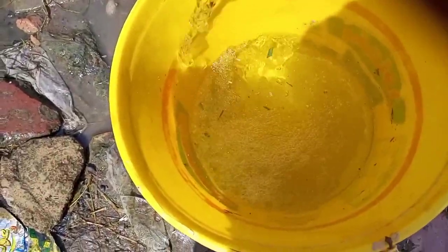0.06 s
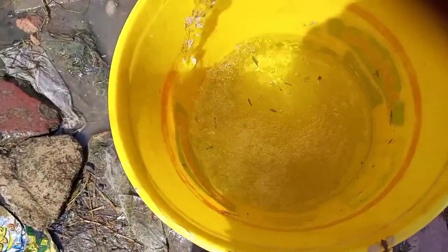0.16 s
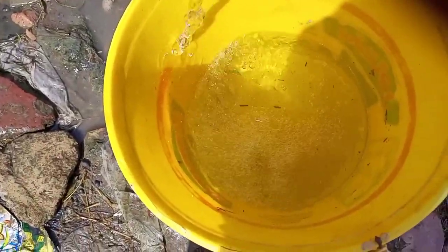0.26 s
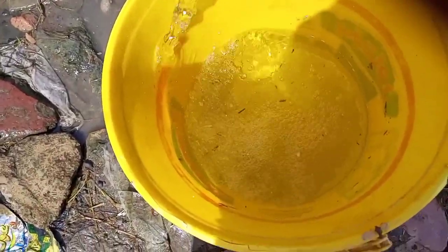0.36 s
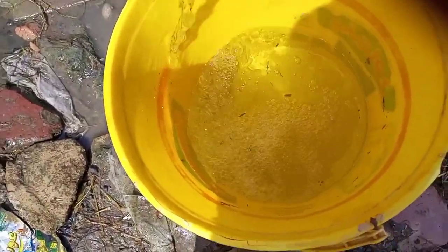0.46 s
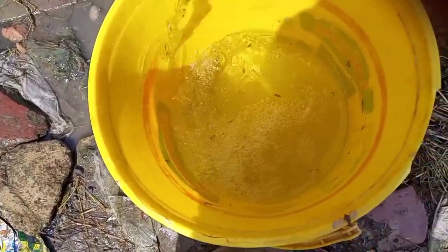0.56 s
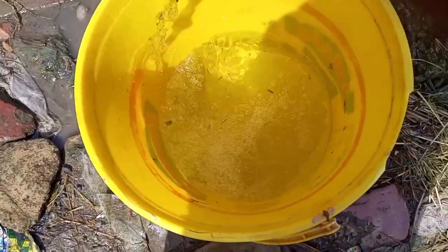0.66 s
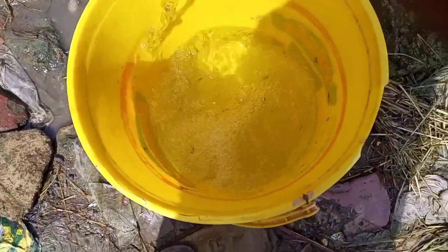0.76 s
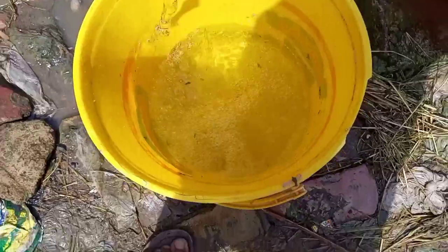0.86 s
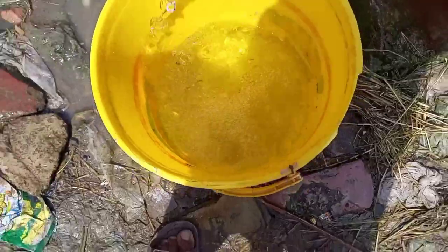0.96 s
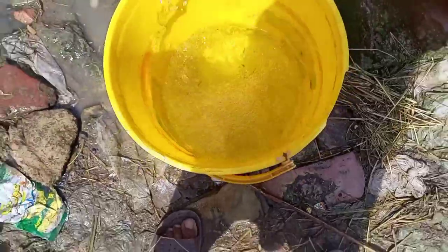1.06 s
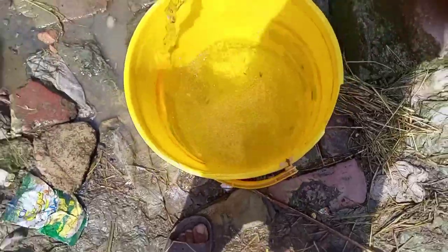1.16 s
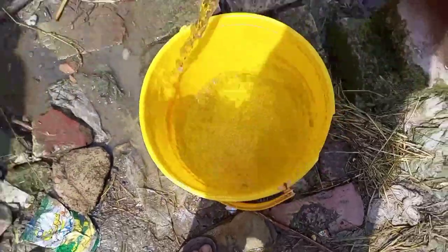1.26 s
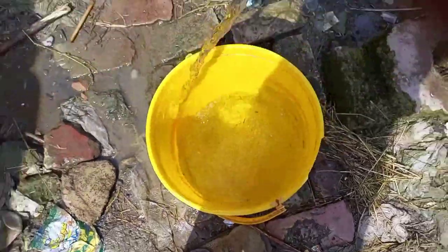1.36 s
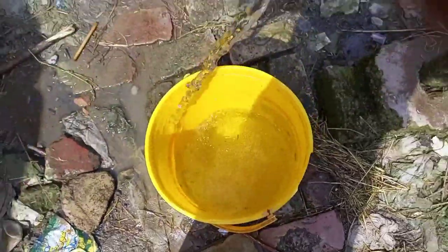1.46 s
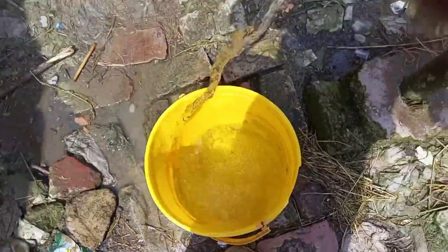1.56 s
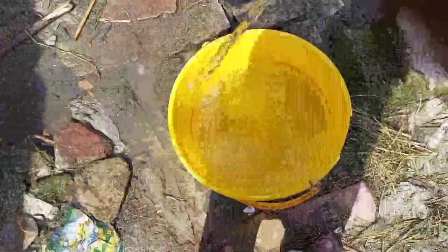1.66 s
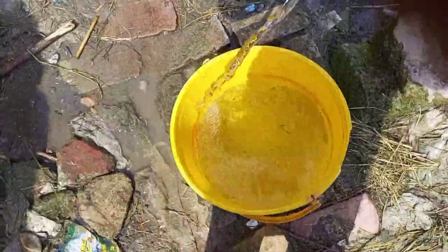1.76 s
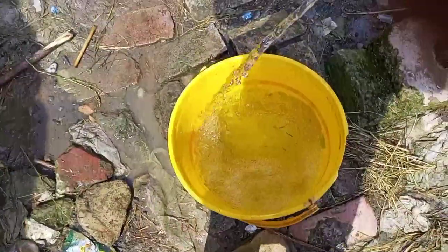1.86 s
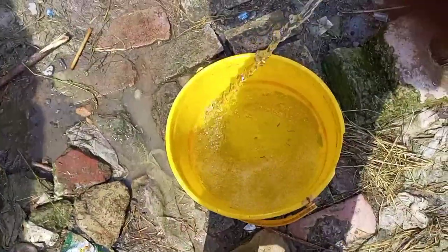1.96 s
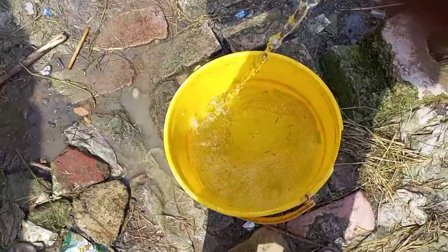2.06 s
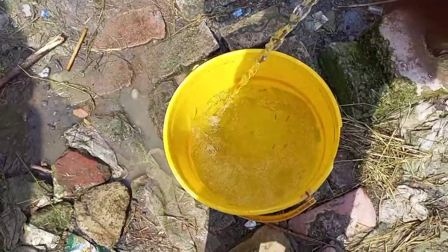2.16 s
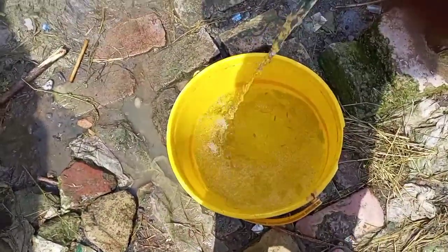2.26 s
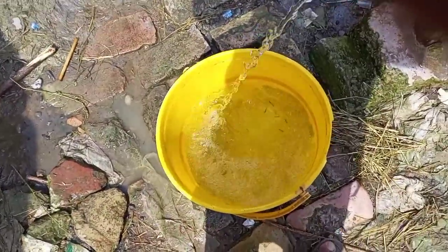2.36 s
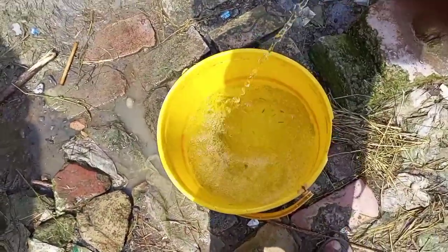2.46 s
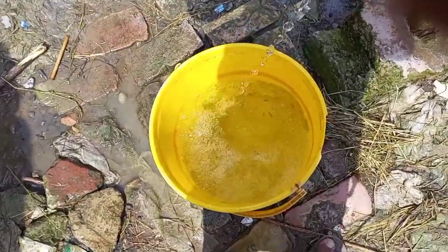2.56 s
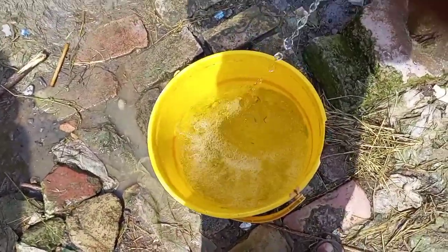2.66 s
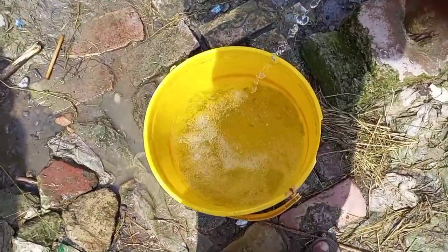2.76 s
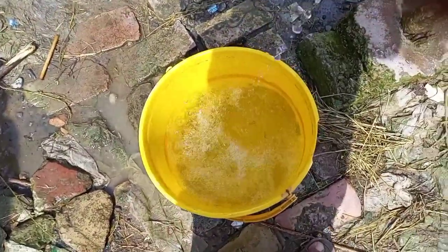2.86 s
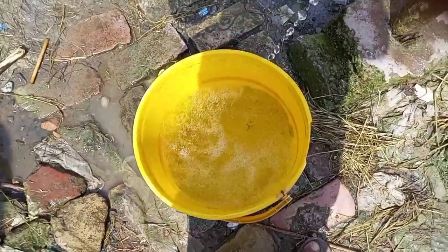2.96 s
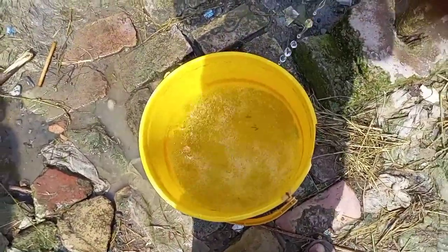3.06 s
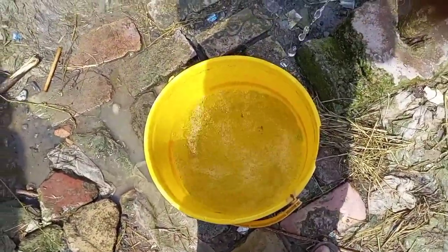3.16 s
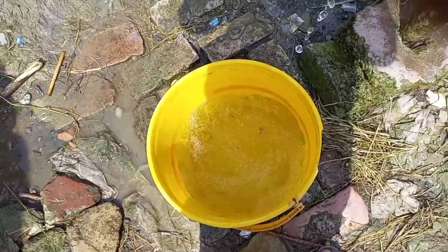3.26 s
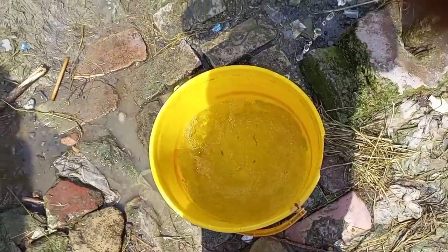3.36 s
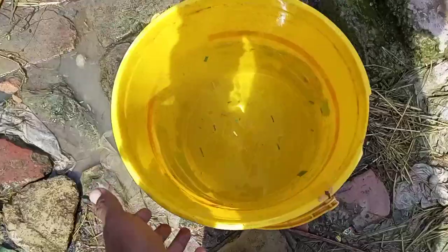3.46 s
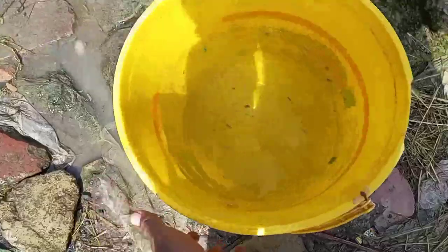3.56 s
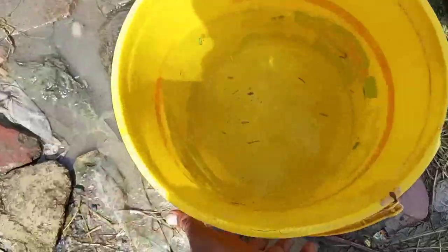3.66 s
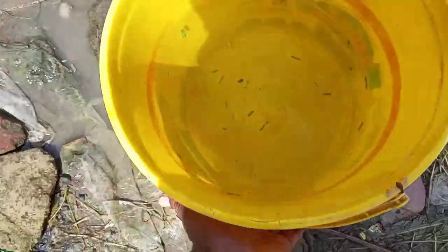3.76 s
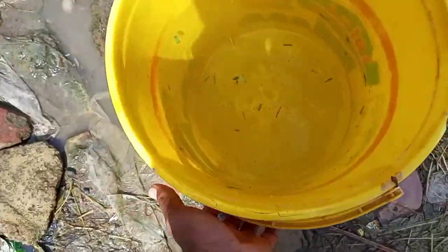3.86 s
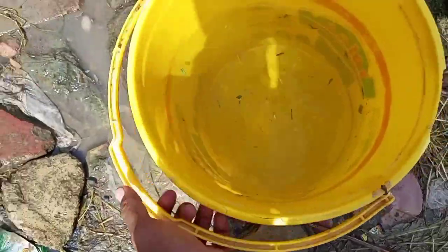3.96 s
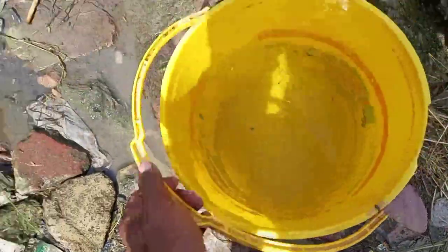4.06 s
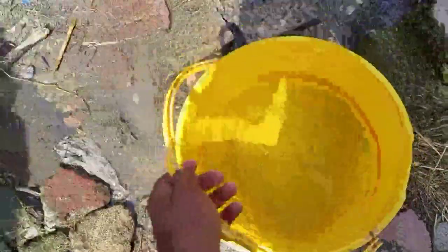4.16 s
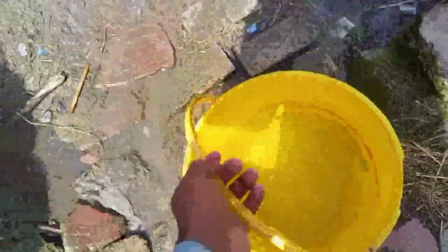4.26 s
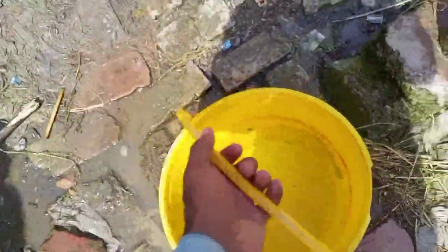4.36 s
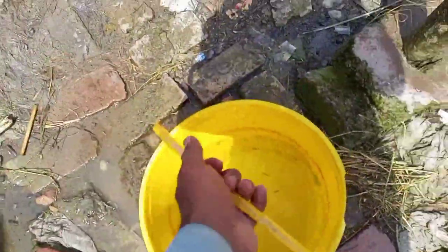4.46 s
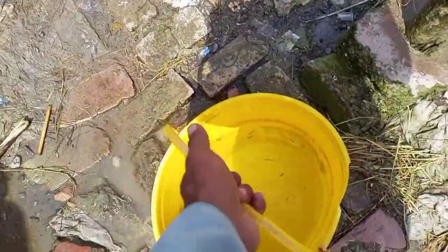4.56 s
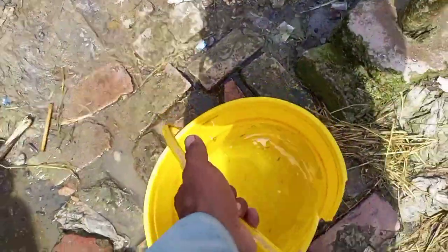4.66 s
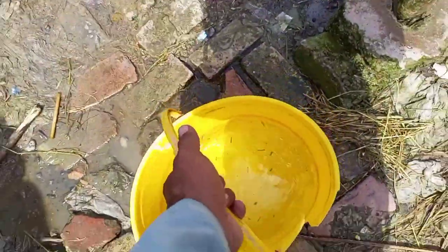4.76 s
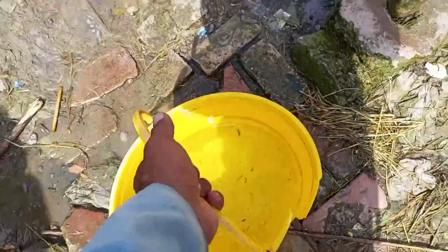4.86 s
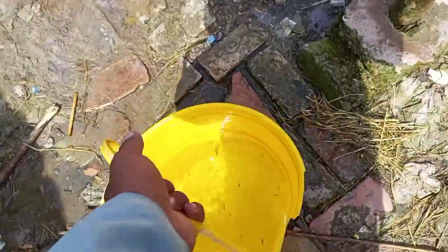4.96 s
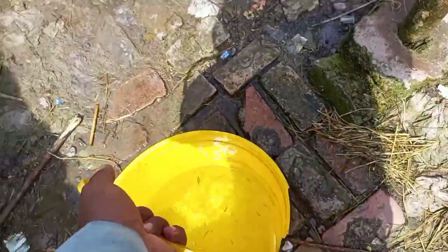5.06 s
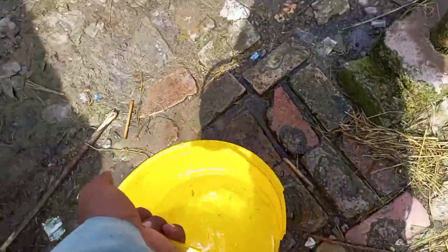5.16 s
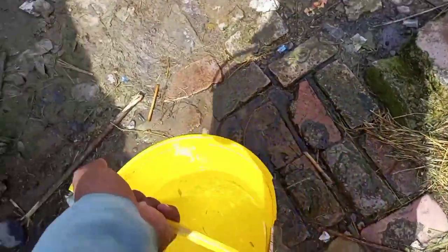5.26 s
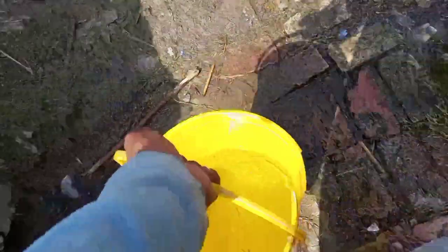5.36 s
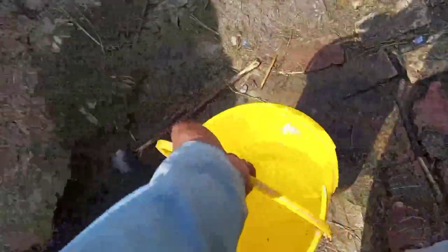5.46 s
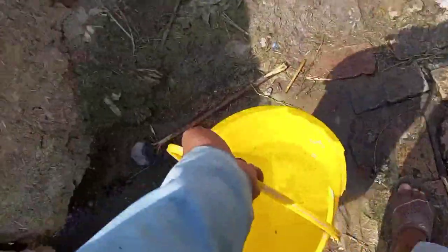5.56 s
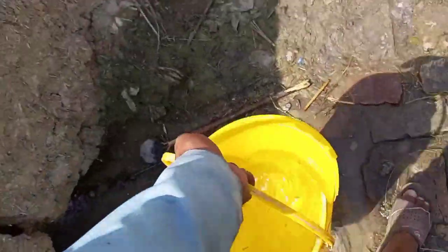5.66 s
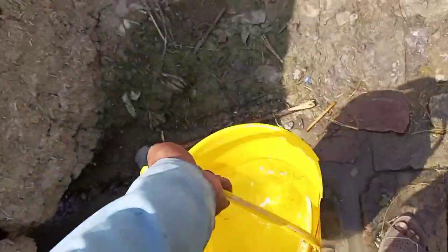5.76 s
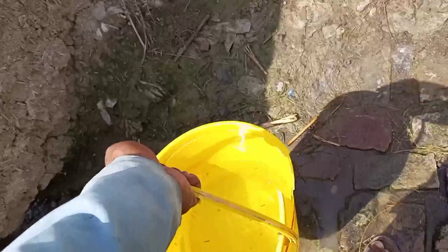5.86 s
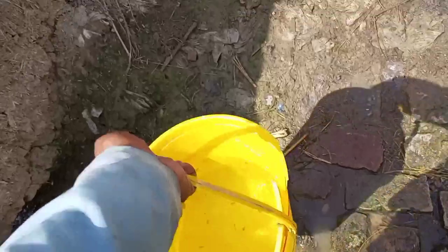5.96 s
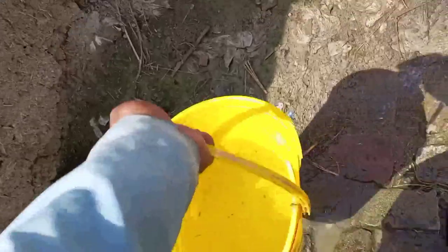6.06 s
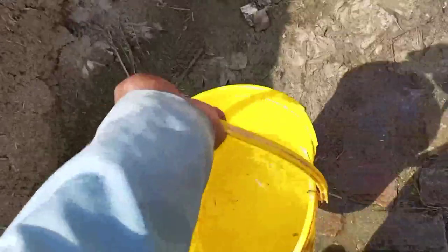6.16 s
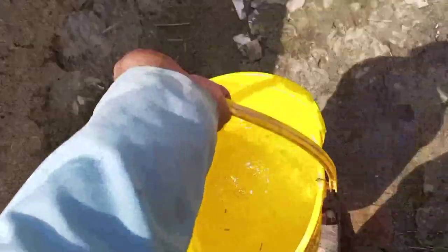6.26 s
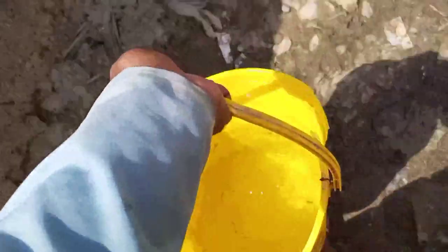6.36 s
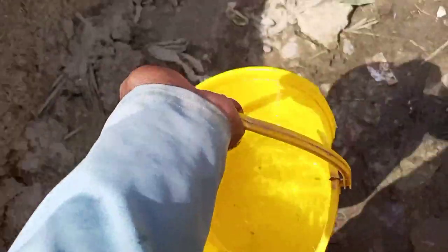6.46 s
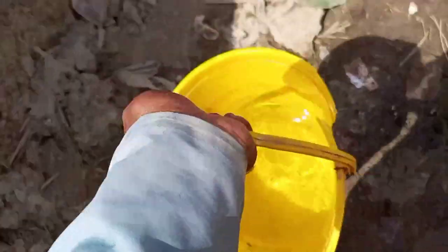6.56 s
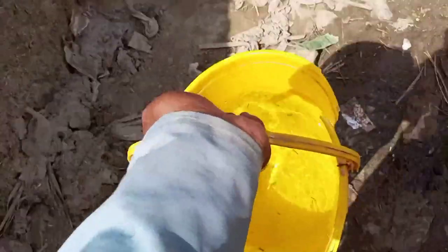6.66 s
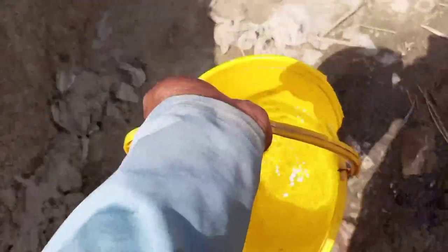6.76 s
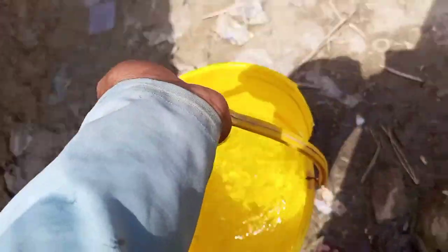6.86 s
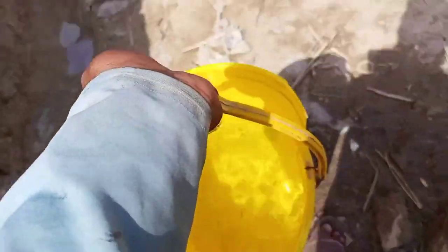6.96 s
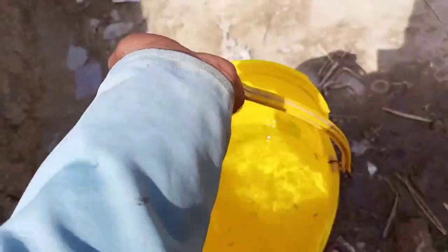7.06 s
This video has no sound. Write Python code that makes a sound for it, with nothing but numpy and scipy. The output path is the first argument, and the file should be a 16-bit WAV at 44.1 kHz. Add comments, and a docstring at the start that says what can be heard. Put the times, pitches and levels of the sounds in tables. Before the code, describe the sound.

From 0 s, a strong jet from a hand pump fizzes and gurgles into a plastic bucket, close and bright, with a short reflection off yard walls. Loose iron clanks at about 0.3, 0.6, 1.0-1.1 and 1.6 s, with a high ping near 1.2. From 1.9 s the flow weakens into lumpy splats, thickest at 2.1-2.9, then thin patter and low plops until about 3.4, with a tiny dropout at 3.5. Harsh rising bird chirps come at 3.7-3.8. The handle scrapes and rattles from 3.8, knocks at 3.9-4.3 and 4.5-4.7, then snaps in a loud double clack at 4.73-4.76; water sways softly. Faint whistles sound around 4.1-4.4 and 5.8-6.1, tweets at 6.3, a chirp at 6.6. From 4.9 to 6.9 a distant engine hoots four times a second. Dull taps at 4.4 and 5.5-5.8, gritty scuffs at 5.8, 6.5 and 7.1, and small ringing drips from 6.8 accompany carrying.

```python
"""A hand pump gushes into a plastic bucket in a village yard: its iron parts clank as noise bursts that ring
modes, while the jet fizzes and gurgles as clouds of bubble tones, then breaks into splats and dies. Harsh
gliding chirps follow; the handle is raised, drags as rattling noise and knocks as clicks and ringing plastic.
Birds whistle gliding tones, and far away a mill engine hoots four times a second with short sagging notes.
Meanwhile the bucket is carried off with noise taps and scuffs, and a few last drips ring."""
import sys
import numpy as np
from scipy import signal
from scipy.fft import rfft, irfft, next_fast_len
from scipy.io import wavfile
from scipy.ndimage import uniform_filter1d, map_coordinates

SR = 44100
rng = np.random.default_rng(int(sys.argv[2]) if len(sys.argv) > 2 else 0)


def wrap_up_sound(samples):
    """Save the sound to the file named by the first command line argument, as 16-bit audio."""
    columns = np.atleast_2d(samples).T
    # keep every value between -1 and 1, then stretch to whole-number steps
    tamed = np.clip(columns, -1, 1)
    steps = np.round(tamed * 32767).astype(np.int16)
    wavfile.write(sys.argv[1], SR, steps)


N = 313536  # length of the scene in samples

# Colour of the faint air noise. Each row: frequency in Hz, level in dB per Hz.
AIR_COLOUR = [(47, -34), (80, -5), (586, -11.5), (3140, -19.5), (4380, -13), (5350, -25), (6670, -13.5),
              (9930, -19.5), (15800, -36.5)]
# Brief swells of faint background noise. Each row: start in seconds, length in seconds, level in dB.
SWELL_TIMES = [(4.786, 0.11, -64.5), (5.046, 0.15, -69)]
# Colour of the swells, strongest near 4.4 kHz. Each row: frequency in Hz, level in dB per Hz.
SWELL_COLOUR = [(1300, -20), (2400, -4.5), (3300, -21.5), (4400, 3), (5400, -19.5), (10000, -14),
                (11500, -31)]
SWELL_RELEASE_S = 0.3  # seconds to fall 60 dB
# Hoots of the mill exhaust. Each row: start in seconds, level in dB before the echo levels.
MILL_HOOTS = [(4.919, -56.5), (5.158, -57), (5.404, -51), (5.65, -49), (5.89, -49.5), (6.129, -50.5),
              (6.374, -51), (6.621, -45), (6.891, -52.5)]

# Level, slightly arched bird notes. Each row: start in seconds, length in seconds, middle pitch in Hz, level in dB.
BIRD_WHISTLES = [(4.054, 0.089, 2530, -57.5), (4.2, 0.079, 2437, -58.5), (4.374, 0.17, 2614, -64.5),
                 (5.825, 0.076, 2440, -72.5), (6.048, 0.092, 2470, -68)]
# Quick falling tweets of another bird. Each row: start in seconds, level in dB.
BIRD_TWEETS = [(6.286, -68), (6.334, -62), (6.388, -66.5)]
# Harsh chirps. Each row: start in seconds, length in seconds, start, middle and end pitch in Hz, level in dB.
BIRD_CHIRPS = [(3.723, 0.053, 3800, 5260, 6330, -47.5), (3.734, 0.068, 2090, 3020, 3500, -58.5),
               (3.753, 0.043, 3870, 3650, 4140, -42), (3.8, 0.0326, 4120, 3804, 3970, -46),
               (6.56, 0.089, 2360, 3970, 3450, -57)]
WHISTLE_ARCH = .025  # share by which the ends of a whistle lie below its middle
CHIRP_RASP = .028  # share by which the pitch of a chirp jitters
BENDS_PER_S = 65  # pitch bends in a bird's note

# Dull taps while lifting and walking. Each row: start in seconds, peak level in dB.
DULL_TAPS = [(4.362, -22), (5.502, -22), (5.576, -36.5), (5.839, -33.5)]
# Colour of a dull tap. Each row: frequency in Hz, level in dB per Hz.
TAP_COLOUR = [(60, -36.5), (700, 7.5), (1200, -1.5), (2400, -20.5), (4000, -36.5)]
# Hand, sleeve and soles scuffing. Each row: start in seconds, length in seconds, level in dB.
SCUFF_TIMES = [(3.9, 0.13, -51), (4.593, 0.19, -54.5), (5.845, 0.0104, -46.5), (6.475, 0.02, -46),
               (6.491, 0.065, -50.5), (6.529, 0.16, -65.5), (7.072, 0.11, -45.5)]
# Colour of the gritty scuffs. Each row: frequency in Hz, level in dB per Hz.
SCUFF_COLOUR = [(100, -29.5), (800, 1.5), (1300, -10), (2900, -2.5), (4400, 8), (10000, 1), (12500, -14)]
SCUFF_ATTACK_SHARE, SCUFF_RELEASE_S = 0.37, 0.041
# The water sways after a jolt. Each row: start in seconds, length in seconds, level in dB.
SWAYS = [(3.962, 0.089, -46), (4.524, 0.18, -52), (4.753, 0.075, -58.5)]
SWAY_ATTACK_SHARE, SWAY_RELEASE_S = 0.64, 0.69

# The handle drags over the rim. Each row: start in seconds, length in seconds, level in dB.
RIM_RUBS = [(3.813, .205, -38), (4.036, 0.069, -51.5), (4.132, 0.0054, -35)]
# Colour of the dragging. Each row: frequency in Hz, level in dB per Hz.
RUB_COLOUR = [(400, -26), (1550, 4.5), (2600, 0.5), (7000, -21.5)]
RUB_ATTACK_SHARE = 0.97
# The handle knocks on the bucket. Each row: start in seconds, then levels in dB of
# the belly, the wall and the click, before the gain of each part.
HANDLE_KNOCKS = [(3.948, -48, -29, -34), (4.013, -50, -16.5, -32), (4.087, -52, -45, -48),
                 (4.112, -47, -43, -55.5), (4.142, -27, -21.5, -37), (4.245, -49, -29, -60.5),
                 (4.269, -39, -38.5, -57.5), (4.503, -46, -33, -62), (4.582, -38, -22.5, -36),
                 (4.664, -46.5, -29.5, -26), (4.729, -17.5, -12, -8), (4.755, -9, -9.5, -8.5)]
# Tones of the water-loaded belly. Each row: pitch in Hz, relative level in dB, time to fall 60 dB in seconds.
BELLY_MODES = [(171, -10.5, 0.17), (243.8, -3.5, 0.17), (330, 7.5, 0.091), (367.4, 11.5, 0.098)]
# Tones of the plastic wall. Each row: pitch in Hz, relative level in dB, time to fall 60 dB in seconds.
WALL_MODES = [(624, -4.5, 0.044), (791, -4, 0.095), (836, 7, 0.046), (1440, 1, 0.018)]
# Colour of the dry click. Each row: frequency in Hz, level in dB per Hz.
CLICK_COLOUR = [(80, -39), (500, -12), (2600, -0.5), (4200, 9), (6500, 2), (10500, -8), (13000, -23),
                (15200, -14)]
# Colour of the handle's rattle against the wall. Each row: frequency in Hz, level in dB per Hz.
RATTLE_COLOUR = [(100, -33.5), (260, -7.5), (500, -6), (900, 2.5), (1450, 11.5), (2100, -8), (3200, -4.5),
                 (6000, -31.5)]
RATTLE_DB, RATTLE_T60 = 16, 0.026  # gain on top of the wall level; seconds to fall 60 dB

# Tones of the pump lever. Each row: pitch in Hz, relative level in dB.
LEVER_MODES = [(647, -13), (1960, -11), (3260, 2), (3810, -1), (5460, -4), (6310, -1), (7090, -9),
               (9130, -4), (9380, -8), (10090, -8), (11680, -13)]
# Tones of the pivot pin. Each row: pitch in Hz, relative level in dB.
PIN_MODES = [(650, -14), (1700, -11), (3600, -4), (4890, 1), (5830, -2), (6080, -3), (6720, -11),
             (8920, -6), (11900, -6), (12200, -3)]
# Tones of the piston rod. Each row: pitch in Hz, relative level in dB.
ROD_MODES = [(2690, -12), (3400, 1), (3780, -2), (4610, -2), (4910, -5), (5060, -5), (5450, 0), (6680, -7),
             (8480, -14), (9120, -10), (9440, -10), (9780, -12), (11170, -6)]
# Blows on the lever. Each row: start in seconds, level in dB before the shared gains,
# decay time of the chatter in seconds, pitch in Hz that the contact point favours.
LEVER_HITS = [(0.276, -24, 0.0062, 4600), (0.291, -18, 0.0024, 3600), (1.021, -26.5, .004, 6200),
              (1.025, -15, 0.0045, 3300), (1.035, -17, 0.015, 4500), (1.081, -20, .011, 5500),
              (1.099, -27, .004, 9100), (1.117, -17, 0.003, 6200), (1.124, -21, 0.0035, 4500)]
# Blows on the pin. Each row: start in seconds, level in dB before the shared gains,
# decay time of the chatter in seconds, favoured pitch in Hz.
PIN_HITS = [(0.606, -21.5, 0.01, 11840), (0.608, -16.5, 0.02, 5000), (0.646, -28, 0.011, 4800)]
# Blows on the rod. Each row: start in seconds, level in dB before the shared gains,
# decay time of the chatter in seconds, favoured pitch in Hz.
ROD_HITS = [(1.597, -27.5, 0.0031, 3550), (1.613, -19.5, 0.0082, 5100), (1.629, -19.5, 0.0096, 4600),
            (1.649, -22, 0.011, 3970), (1.659, -16, 0.0016, 8260)]
# Colour of the bare iron contacts. Each row: frequency in Hz, level in dB per Hz.
CONTACT_COLOUR = [(500, -19), (1700, -8), (4500, 3), (13000, -20)]
CHATTER_RISE_SHARE = 0.54  # rise time of a burst over its decay time
FOCUS_DB_PER_OCTAVE = 13  # loss of a mode away from the favoured pitch, up to half an octave

# Drips, and first one high iron ping at 1.186 s. Each row: start in seconds,
# peak level in dB before a shared gain, pitch in Hz.
PINGS_AND_DRIPS = [(1.186, -18.5, 9820), (3.6889, -46.5, 7010), (6.8175, -41.5, 4204),
                   (6.9233, -45.5, 1360), (7.0095, -43, 4520)]
# Single splats. Each row: start in seconds, peak level in dB before a shared gain, pitch in Hz.
SPLAT_DROPS = [(0.2327, -15.5, 6550), (0.4745, -15, 1780), (1.3226, -17.5, 4960), (2.166, -16, 1930),
               (2.197, -14, 2220), (2.2925, -13, 1830), (2.4811, -15.5, 1780), (2.579, -14, 1920),
               (2.605, -11.5, 1740), (2.6212, -10.5, 1405), (2.6633, -11, 1604), (2.705, -19, 1730),
               (2.76, -10, 1860), (2.8105, -17, 2860), (2.84, -17, 3040), (2.914, -18, 3880),
               (2.9867, -18.5, 4020), (3.018, -24.5, 3980), (3.0844, -33.5, 3940), (3.3754, -38.5, 1880)]
# Low plops of heavy water. Each row: start in seconds, peak level in dB, pitch in Hz.
LOW_PLOPS = [(2.49, -27.5, 196), (3.254, -35, 167), (3.276, -33, 159), (3.289, -30.5, 187),
             (3.316, -25.5, 161)]
# Big single air pockets. Each row: start in seconds, peak level in dB, pitch in Hz.
AIR_GLUGS = [(0.429, -36, 308), (1.745, -36.5, 327), (1.772, -31.5, 332), (2.175, -32, 398)]
GLUG_T60 = 0.11  # seconds to fall 60 dB

# Air resonances of the bucket above the water after one second of filling. Each row: pitch in Hz, level in dB.
BUCKET_AIR_MODES = [(635, 5), (791, 6), (1280, 5), (1680, 3.5), (1950, -7.5), (2330, 0.5), (3650, -5.5)]
HOLLOW_WIDTH_SHARE = .03  # width of a resonance over its pitch
HOLLOW_RISE_PER_S = .06  # share by which the resonances rise as the water does
# Lumps of the jet landing. Each row: start in seconds, length in seconds, level in dB, bubble pitch in Hz.
JET_SLUGS = [(0.461, 0.04, -36.5, 1900), (0.69, 0.093, -38.5, 1227), (1.775, 0.14, -39.5, 3440),
             (2.084, 0.039, -35.5, 2390), (2.153, 0.12, -32.5, 1895), (2.339, 0.17, -43, 1910),
             (2.487, 0.097, -35.5, 2130), (2.483, 0.13, -37.5, 5430), (2.566, 0.082, -33, 1663),
             (2.638, 0.088, -34, 1560), (2.667, 0.1, -32.5, 2920), (2.716, 0.028, -35, 4580),
             (2.831, 0.048, -42, 1337), (2.849, 0.083, -40.5, 4150), (2.967, 0.033, -40, 4180),
             (2.973, 0.024, -38.5, 2090), (3.015, 0.014, -36, 3870)]
SLUG_ATTACK_SHARE, SLUG_RELEASE_S = 0.22, 0.085
SLUG_SPREAD_HZ = 800  # bubble pitches lie about this far around that of their slug, less for low slugs
# Strength of the jet as the pump runs dry. Each row: time in seconds, flow in dB (only its changes matter).
JET_FLOW = [(0.0, -39), (1.88, -46.5), (2.38, -49), (3.08, -54), (3.29, -59), (3.47, -60.5)]
# Colour of the splash. Each row: frequency in Hz, level in dB per Hz.
SPLASH_COLOUR = [(60, -28), (450, -7.5), (650, -7.5), (1500, -4), (2500, 7), (3600, -9)]
# Colour of the spray. Each row: frequency in Hz, level in dB per Hz.
SPRAY_COLOUR = [(900, -43.5), (2800, -2), (3800, -5), (6300, -3), (8200, -6), (10200, 3.5), (11800, -21.5),
                (15200, -22.5)]
# Colour of the mist. Each row: frequency in Hz, level in dB per Hz.
MIST_COLOUR = [(8000, -28), (11500, -6), (13500, -9.5), (15200, -2.5)]
# Each layer of the jet: level in dB at full flow (before surges), and dB gained per dB of flow.
SPLASH_DB, SPLASH_GROWS = -40.5, 1.4
SPRAY_DB, SPRAY_GROWS = -38.5, 0.86
MIST_DB, MIST_GROWS = -47.5, 0.87
POCKET_DB, POCKET_GROWS = -51, 0.24
CHURN_DB = -65  # grows like the pockets
POCKET_HZ, POCKET_RISE_HZ_PER_S = 281, 31.6  # the air pockets shrink as the jet weakens
JET_BREAKS_S, JET_ENDS_S = 3.02, 3.45  # the jet breaks into drops, then the drops stop
JET_RELEASE_S = 0.0586  # seconds to fall 60 dB
TOP_HZ = 15750  # nothing passes from here up


def amp(db):
    """Turn dB into a plain gain."""
    return 10 ** (np.asarray(db) / 20)


def unit(x):
    """Scale a sound to an average (rms) level of one."""
    return x / np.sqrt(np.mean(x ** 2) + 1e-20)


def clock(seconds):
    """Time in seconds at each sample, from zero."""
    return np.arange(int(seconds * SR)) / SR


def curves(rows):
    """One value per sample for each column after the time."""
    s, *columns = np.transpose(rows)
    return [np.interp(np.arange(N) / SR, s, column) for column in columns]


def wobble(rate):
    """A smooth random curve through rate random points a second."""
    points = rng.standard_normal(int(N * rate / SR) + 4)
    return map_coordinates(points, [np.arange(N) * rate / SR])


def add(track, s, sound):
    """Mix a sound into a track at time s."""
    start = max(0, round(s * SR))
    track[start:start + len(sound)] += sound[:max(0, len(track) - start)]


def stroke(s, length, attack_share, release_s):
    """Gain that rises over a share of its length, holds, then falls 60 dB in release_s."""
    t = np.arange(N) / SR - s
    rise = np.clip(t / (attack_share * length), 0, 1)
    return rise * amp(-60 * np.maximum(t - length, 0) / release_s)


def until(s):
    """Gain of one that dies away after time s."""
    return amp(-60 * np.maximum(np.arange(N) / SR - s, 0) / JET_RELEASE_S)


def colour(x, points):
    """Filter through (Hz, dB) points, with a response that never starts before its input."""
    m = 2 * next_fast_len(len(x) // 2 + 2048)
    hz, db = np.transpose(points)
    log_hz = np.log(np.fft.rfftfreq(m, 1 / SR) + 1)
    cepstrum = irfft(np.log(amp(np.interp(log_hz, np.log(hz), db))))
    # folding the cepstrum forward makes the filter minimum phase
    cepstrum[1:m // 2] *= 2
    cepstrum[m // 2 + 1:] = 0
    return irfft(rfft(x, m) * np.exp(rfft(cepstrum)))[:len(x)]


def ring(modes, scatter_db, detune=0):
    """Free ringing of a struck body, of energy 1; mode strengths, and pitches if detuned, shift at each blow."""
    t = clock(.5)
    x = np.zeros(len(t))
    for hz, db, t60 in modes:
        fade = amp(db + scatter_db * rng.normal() - 60 * t / t60)
        tone = np.sin(2 * np.pi * hz * (1 + detune * rng.normal()) * t)
        onset = (1 - np.exp(-2 * hz * t)) ** 2
        x += fade * tone * onset * rng.choice([-1, 1])
    return x / np.linalg.norm(x)


def bubbles(rate, pitch_hz, spread, cycles, size_db, size, count=N):
    """A cloud, count samples long and of rms 1, of dying, slightly rising bubble tones of size samples each."""
    draw = rng.random((int(rate * count / SR), 4))
    at = (draw[:, 0] * count).astype(int)
    hz = np.broadcast_to(pitch_hz, N)[at] * np.exp(spread * (draw[:, 1] + draw[:, 2] - 1))
    turns = np.minimum(hz, SR / 3)[:, None] * np.arange(size) / SR
    age = turns / cycles
    strength = amp(-size_db * np.log(np.maximum(draw[:, 3], .01)))
    swell = (1 - np.exp(-2 * turns)) ** 2 * np.exp(-np.pi * age) * np.linspace(1, 0, size) ** .5
    rising = turns * (1 + 0.033 * np.minimum(age, 2))
    tone = strength[:, None] * swell * np.sin(2 * np.pi * rising)
    places = at[:, None] + np.arange(size)
    return unit(np.bincount(places.ravel(), tone.ravel(), count)[:count])


def bounces(x, share, t60):
    """Add a brief dense echo tail, as of sound bouncing between walls, which combs the spectrum."""
    t = clock(.08)
    tail = rng.standard_normal(len(t)) * amp(-60 * t / t60)
    return unit(x + share * signal.fftconvolve(x, tail / np.linalg.norm(tail))[:len(x)])


def hollow(x, s, direct_db):
    """Sound from the water surface at time s, heard directly and through the bucket's air resonances."""
    # reading the resonances at lower frequencies moves them up as time passes
    f = np.fft.rfftfreq(len(x), 1 / SR) / (1 + HOLLOW_RISE_PER_S * (s - 1))
    modes = sum(amp(db) / (1 + 1j * (f / hz - hz / (f + 1)) / HOLLOW_WIDTH_SHARE)
                for hz, db in BUCKET_AIR_MODES)
    return unit(irfft(rfft(x) * (amp(direct_db) + modes), len(x)))


def yard(x, t60):
    """Diffuse answer of the walls, duller than the direct sound."""
    t = clock(0.44)
    noise = rng.standard_normal(len(t)) * amp(-60 * t / t60) * (1 - np.exp(-t / 0.0049))
    tail = colour(noise, [(300, 7), (3000, 3.0), (12000, -9.0)])
    return signal.fftconvolve(x, tail / np.linalg.norm(tail))[:N]


def air():
    """Faint coloured noise whose level drifts slowly."""
    return amp(-73.5 + wobble(1.7)) * unit(colour(rng.standard_normal(N), AIR_COLOUR))


def background_swells():
    """Faint background noise near 4.4 kHz swells briefly."""
    gain = sum(amp(db) * stroke(s, length, SCUFF_ATTACK_SHARE, SWELL_RELEASE_S)
               for s, length, db in SWELL_TIMES)
    return gain * unit(colour(rng.standard_normal(N), SWELL_COLOUR))


def mill():
    """Each exhaust puff blows a short, unsteady, sagging note, and a far wall repeats it."""
    out, t = np.zeros(N), clock(0.031)
    u = t / t[-1]
    for s, db in MILL_HOOTS:
        for delay, echo_db in [(0, -0.5), (.035, -13.5)]:
            flutter = unit(uniform_filter1d(rng.standard_normal(len(t)), size=250))
            hz = 635 * (1 - 0.16 * u + 0.061 * flutter)
            swell = np.sin(np.pi * u ** 0.82) ** 2
            add(out, s + delay, amp(db + echo_db) * swell * np.sin(2 * np.pi * np.cumsum(hz) / SR))
    return out


def note(length, glide_hz, rasp):
    """A whistle gliding through start, middle and end pitch; rasp makes it jitter, bend and flutter in level."""
    t = clock(length)
    u = t / length
    hz = np.polyval(np.polyfit([0, .5, 1], glide_hz, 2), u)
    jitter = unit(uniform_filter1d(rng.standard_normal(len(t)), size=30)) + wobble(BENDS_PER_S)[:len(t)]
    flutter = unit(amp(140 * rasp * wobble(450)[:len(t)]))
    swell = np.sqrt(2 * np.abs(np.sin(np.pi * u)))
    return flutter * swell * np.sin(2 * np.pi * np.cumsum(hz * (1 + rasp * jitter)) / SR)


def birds():
    """Gliding tones make level whistles, falling tweets and harsh, mostly rising chirps."""
    out = np.zeros(N)
    for s, length, hz, db in BIRD_WHISTLES:
        arch_hz = hz * (1 - WHISTLE_ARCH * np.array([1, 0, 1]))
        add(out, s, amp(db) * note(length, arch_hz, rasp=0.0073))
    for s, db in BIRD_TWEETS:
        add(out, s, amp(db) * note(0.029, (4450, 3330, 2550), rasp=0.0326))
    for s, length, *glide_hz, db in BIRD_CHIRPS:
        add(out, s, amp(db) * note(length, glide_hz, rasp=CHIRP_RASP))
    return out


def carrying():
    """Soft taps are short dull noise; gritty scuffs mix noise with tiny short tones."""
    out, t = np.zeros(N), clock(.05)
    for s, db in DULL_TAPS:
        tap = colour(rng.standard_normal(len(t)) * amp(-60 * t / 0.029), TAP_COLOUR)
        add(out, s, amp(db) * tap / np.abs(tap).max())
    grains = bubbles(rate=1500, pitch_hz=3200, spread=2, cycles=9, size_db=2, size=400)
    grit = grains + .8 * rng.standard_normal(N)
    gain = sum(amp(db) * stroke(s, length, SCUFF_ATTACK_SHARE, SCUFF_RELEASE_S)
               for s, length, db in SCUFF_TIMES)
    return out + gain * unit(colour(grit * amp(4 * wobble(140)), SCUFF_COLOUR))


def swaying():
    """Each jolt sets the water swaying: round low bubbles and weaker higher ones."""
    low = bubbles(rate=110, pitch_hz=360, spread=.35, cycles=11, size_db=2.5, size=2800)
    high = bubbles(rate=110, pitch_hz=850, spread=.25, cycles=14, size_db=1.5, size=1500)
    gain = sum(amp(db) * stroke(s, length, SWAY_ATTACK_SHARE, SWAY_RELEASE_S) for s, length, db in SWAYS)
    return gain * (low + 0.39 * high)


def rubbing():
    """The handle drags over the rim: small slips swell, rattle and ring the wall."""
    slips = rng.standard_normal(N) * amp(6.5 * wobble(130))
    rattle = bounces(colour(slips, RUB_COLOUR), share=0.93, t60=0.025)
    wall = unit(signal.fftconvolve(slips, ring(WALL_MODES, scatter_db=5))[:N])
    gain = sum(amp(db) * stroke(s, length, RUB_ATTACK_SHARE, SCUFF_RELEASE_S) ** 2
               for s, length, db in RIM_RUBS)
    return gain * (rattle + .5 * wall)


def knocks():
    """The handle snaps over the rim: a dry click, the rattling plastic wall, and the water-loaded belly."""
    out, t = np.zeros(N), clock(0.071)
    for s, belly_db, wall_db, click_db in HANDLE_KNOCKS:
        snap = rng.standard_normal(len(t)) * amp(-60 * t / 0.022) * (1 - np.exp(-t / 0.0005))
        click = colour(snap, CLICK_COLOUR)
        add(out, s, amp(click_db + 17.5) * click / np.linalg.norm(click))
        add(out, s + .0015, amp(wall_db + 23.0) * ring(WALL_MODES, scatter_db=2.5, detune=0.03))
        rattle = colour(rng.standard_normal(len(t)) * amp(-60 * t / RATTLE_T60), RATTLE_COLOUR)
        add(out, s + 0.0013, amp(wall_db + RATTLE_DB) * rattle / np.linalg.norm(rattle))
        add(out, s + 0.002, amp(belly_db + 24.5) * ring(BELLY_MODES, scatter_db=0.5, detune=0.047))
    return out


def clanks(blows, modes, t60, ring_db, crack_db):
    """Loose iron chatters at each turn of the stroke: a burst of tiny contacts rings the part."""
    out, t = np.zeros(N), clock(.25)
    for s, db, length, focus_hz in blows:
        rough = rng.standard_normal(len(t)) * amp(5.5 * rng.standard_normal(len(t)))
        contacts = rough * np.exp(-t / length) * (1 - np.exp(-t / (CHATTER_RISE_SHARE * length)))
        crack = bounces(colour(contacts, CONTACT_COLOUR), share=0.96, t60=0.034)
        # modes far from the favoured pitch ring less
        excited = []
        for hz, level in modes:
            octaves_off = min(abs(np.log2(hz / focus_hz)), .5)
            excited.append((hz, level - FOCUS_DB_PER_OCTAVE * octaves_off, t60))
        tone = signal.fftconvolve(contacts, ring(excited, scatter_db=3.5))[:len(t)]
        add(out, s, amp(db + ring_db) * tone / np.linalg.norm(tone))
        add(out, s, amp(db + crack_db) * crack / np.linalg.norm(crack))
    return out


def pump():
    """Lever, pivot pin and piston rod clank, each with its own tones."""
    lever = clanks(LEVER_HITS, LEVER_MODES, t60=0.062, ring_db=24.5, crack_db=23.5)
    pin = clanks(PIN_HITS, PIN_MODES, t60=0.064, ring_db=28.0, crack_db=19)
    rod = clanks(ROD_HITS, ROD_MODES, t60=0.1, ring_db=27.5, crack_db=19.5)
    return lever + pin + rod


def drops(rows, gain_db, t60, spit):
    """A spit of noise and a small cluster of dying tones, as when a lump of water lands and rings bubbles."""
    out, t = np.zeros(N), clock(.06)
    for s, db, hz in rows:
        modes = [(hz, 0, t60), (hz * 0.84, -10, t60), (hz * 0.78, -7, t60 / 2)]
        cluster = ring(modes, scatter_db=1.5)[:len(t)]
        burst = colour(rng.standard_normal(len(t)) * amp(-60 * t / t60),
                       [(hz / 8, -35), (hz * 0.83, -14), (hz * 1.2, 0), (hz * 4, -24)])
        x = cluster + spit * burst / np.linalg.norm(burst)
        add(out, s, amp(db + gain_db) * x / np.abs(x).max())
    return out


def plops():
    """Heavy slugs push a short low swing into the water; big air pockets ring longer."""
    out = np.zeros(N)
    for s, db, hz in LOW_PLOPS:
        x = ring([(hz, 0, .055), (hz * 1.45, -5, .04), (620, -9, .015)], scatter_db=2.0)
        add(out, s, amp(db) * x / np.abs(x).max())
    for s, db, hz in AIR_GLUGS:
        x = ring([(hz, 0, GLUG_T60)], scatter_db=0)
        add(out, s, amp(db) * x / np.abs(x).max())
    return out


def slugs():
    """Each slug patters onto the surface and sheds bubbles of its own size, which ring the bucket's hollow."""
    out, n = np.zeros(N), SR // 4
    for s, length, db, hz in JET_SLUGS:
        spread = min(SLUG_SPREAD_HZ / hz, .4)
        cloud = bubbles(rate=1600, pitch_hz=hz, spread=spread, cycles=24, size_db=4.5, size=900, count=n)
        # smaller daughter bubbles
        cloud += 0.16 * bubbles(rate=930, pitch_hz=4080, spread=0.59, cycles=18, size_db=-1.5, size=500, count=n)
        cloud = hollow(cloud, s, direct_db=-6.5)
        # the slug sets the loudness, whatever the bubble size
        cloud /= np.sqrt(np.abs(uniform_filter1d(cloud ** 2, size=1500)) + 1e-9)
        add(out, s, amp(db) * cloud * stroke(0, length, SLUG_ATTACK_SHARE, SLUG_RELEASE_S)[:n])
    return out


def water():
    """The jet tears the surface into mist, spray and small bubbles and drives big air pockets under it."""
    n = 4 * SR
    flow_db = curves(JET_FLOW)[0][:n]
    flow_db = flow_db - flow_db[:SR].mean()  # full flow is the average of the first second
    # the jet arrives in lumps
    surge = amp(2.9 * wobble(50)[:n])
    splash_surge = amp(2.9 * wobble(50)[:n])

    splash_hz = 1500 * np.exp(.2 * wobble(16))
    splash = bubbles(rate=2600, pitch_hz=splash_hz, spread=1.1, cycles=26, size_db=4.2, size=1400, count=n)
    splash = unit(colour(hollow(splash, 0.91, direct_db=3.5), SPLASH_COLOUR))
    fizz_hz = 5200 * np.exp(0.18 * wobble(30))
    fizz = bubbles(rate=2400, pitch_hz=fizz_hz, spread=.9, cycles=42, size_db=3.5, size=600, count=n)
    ticks = bubbles(rate=2200, pitch_hz=8634, spread=0.87, cycles=3.5, size_db=7.0, size=140, count=n)
    spray = unit(colour(bounces(fizz + .8 * ticks, share=0.5, t60=0.15), SPRAY_COLOUR))
    mist = unit(colour(ticks + rng.standard_normal(n), MIST_COLOUR))
    jet = splash_surge * amp(SPLASH_DB + SPLASH_GROWS * flow_db) * splash
    jet += surge * amp(SPRAY_DB + SPRAY_GROWS * flow_db) * spray
    jet += surge * amp(MIST_DB + MIST_GROWS * flow_db) * mist

    pocket_hz = POCKET_HZ + POCKET_RISE_HZ_PER_S * np.arange(N) / SR
    pockets = bubbles(rate=200, pitch_hz=pocket_hz, spread=0.2, cycles=12, size_db=4.0, size=3600, count=n)
    pockets *= amp(POCKET_DB + POCKET_GROWS * flow_db)
    churn = bubbles(rate=81, pitch_hz=154.0, spread=1.0, cycles=3.1, size_db=3.0, size=3600, count=n)
    churn *= amp(CHURN_DB + POCKET_GROWS * flow_db)
    whole = (jet + churn) * until(JET_ENDS_S)[:n] + pockets * until(JET_BREAKS_S)[:n]
    return np.pad(whole, (0, N - n))


def scene():
    """Mix the near and far sounds, each with its own answer of the walls, over the air noise."""
    far = birds() + mill()
    near = background_swells() + carrying() + swaying() + rubbing() + knocks() + pump()
    near += drops(PINGS_AND_DRIPS, gain_db=1.5, t60=0.032, spit=0.45)
    near += drops(SPLAT_DROPS, gain_db=-4.5, t60=0.023, spit=0.44)
    near += plops() + slugs() + water()
    near = near + amp(-25.5) * yard(near, t60=0.086)
    far = far + amp(-7.0) * yard(far, t60=0.17)
    return (near + far + air())[None]


def record(dry):
    """Peaks are rounded off, the sound drops out for an instant, and nothing passes above the band limit."""
    t = np.arange(N) / SR
    live = (t < 3.475) | (t > 3.52)
    x = live * dry / (1 + (dry / .75) ** 4) ** .25
    return irfft(rfft(x) * (np.fft.rfftfreq(N, 1 / SR) < TOP_HZ), N)


dry = scene()
out = record(dry)
wrap_up_sound(out)
```